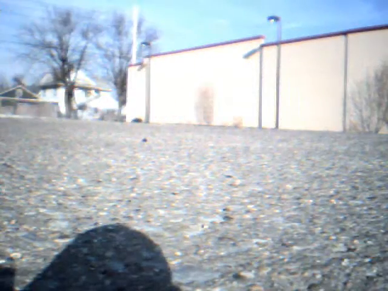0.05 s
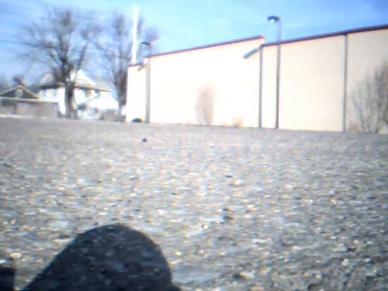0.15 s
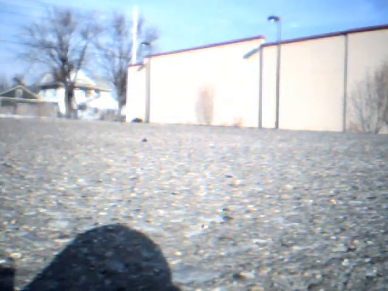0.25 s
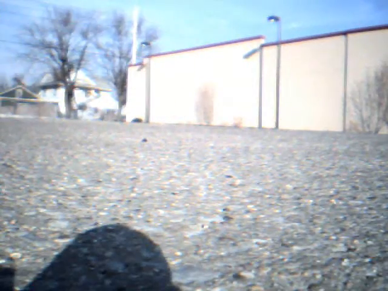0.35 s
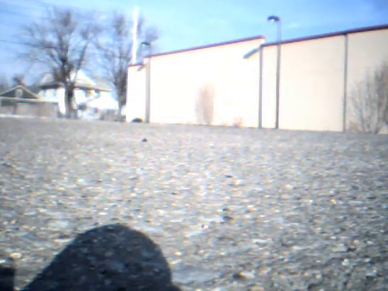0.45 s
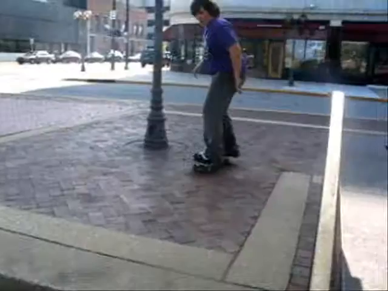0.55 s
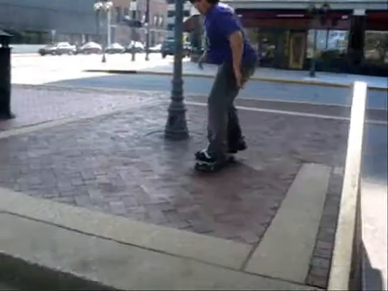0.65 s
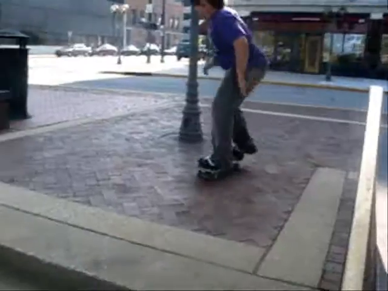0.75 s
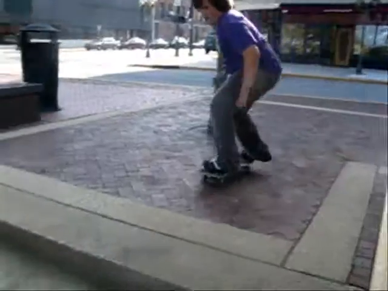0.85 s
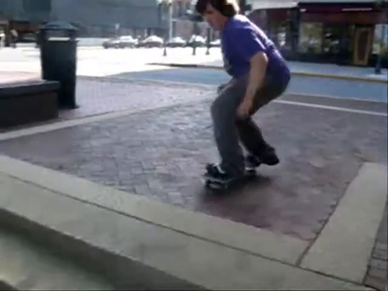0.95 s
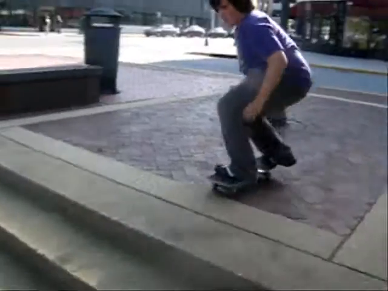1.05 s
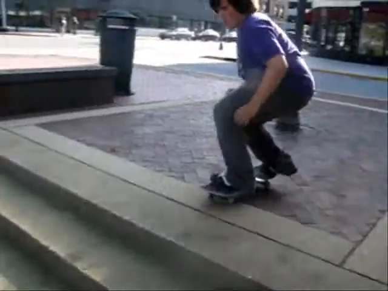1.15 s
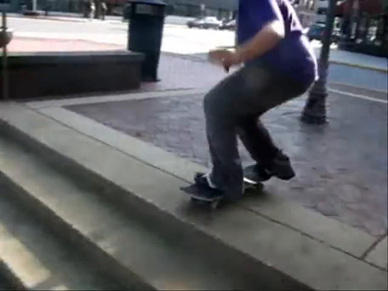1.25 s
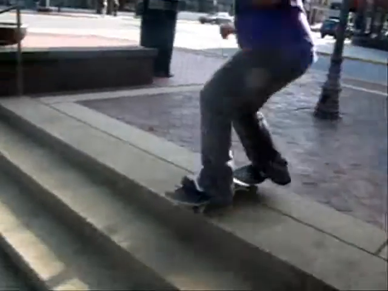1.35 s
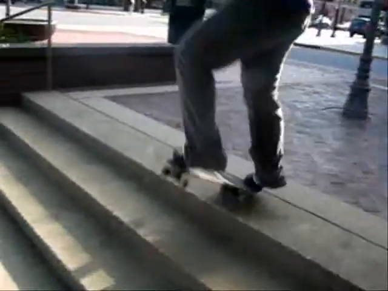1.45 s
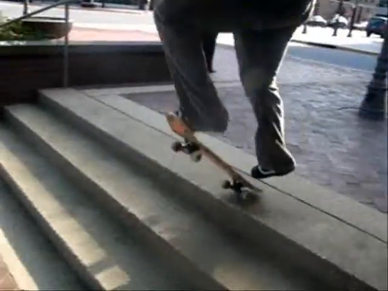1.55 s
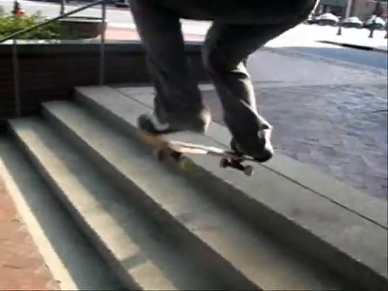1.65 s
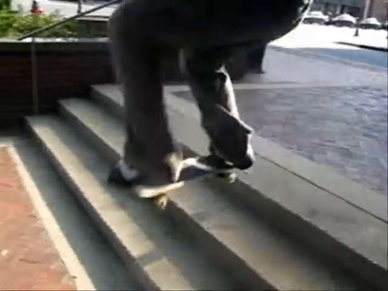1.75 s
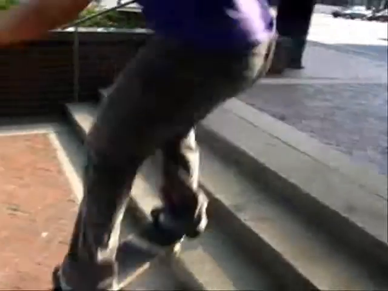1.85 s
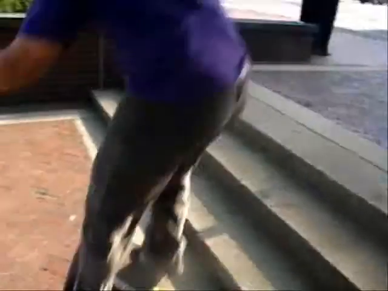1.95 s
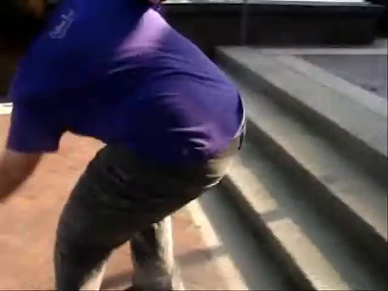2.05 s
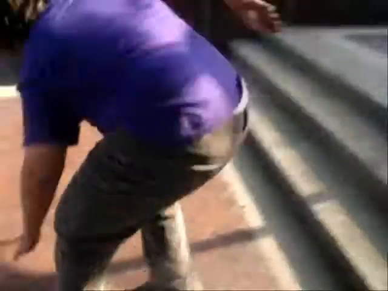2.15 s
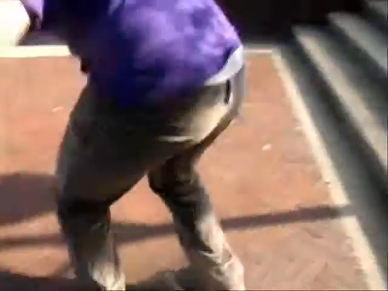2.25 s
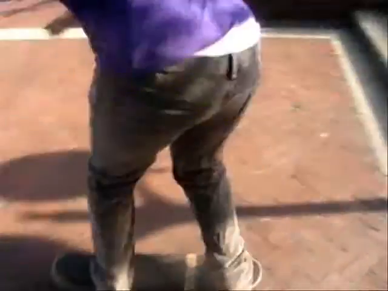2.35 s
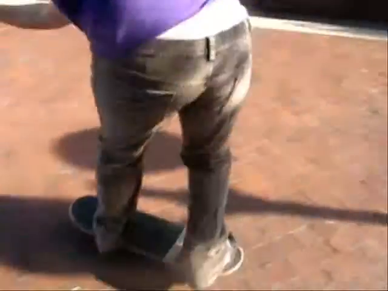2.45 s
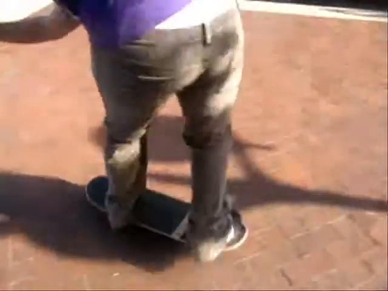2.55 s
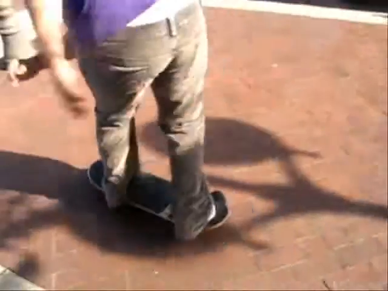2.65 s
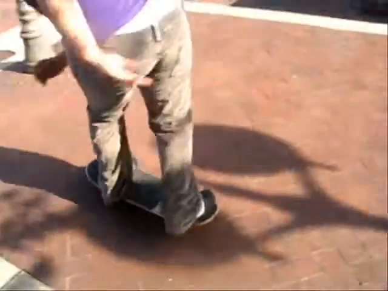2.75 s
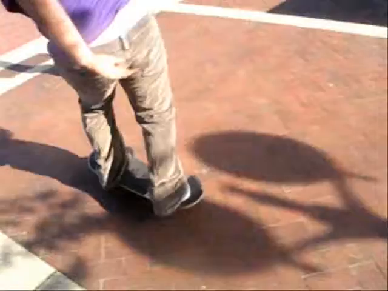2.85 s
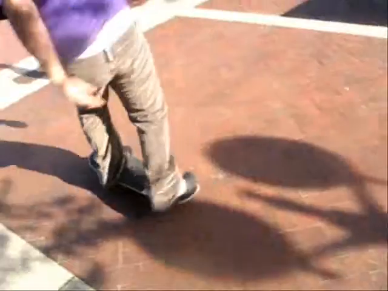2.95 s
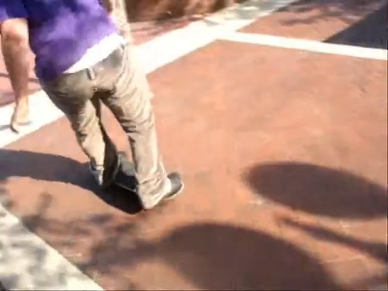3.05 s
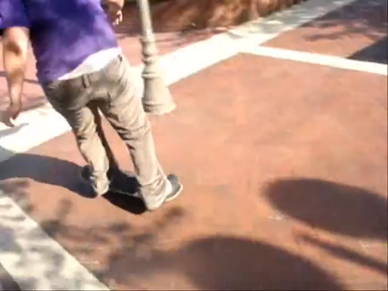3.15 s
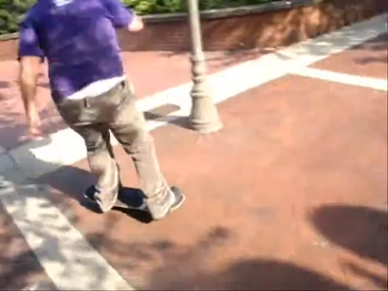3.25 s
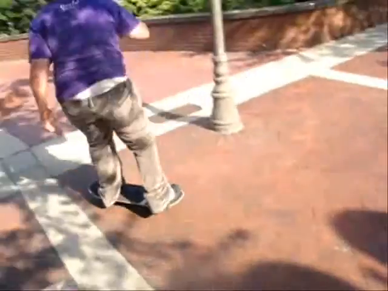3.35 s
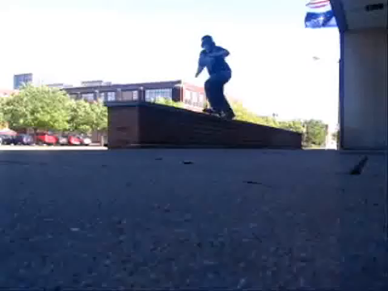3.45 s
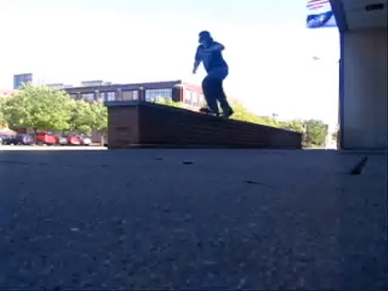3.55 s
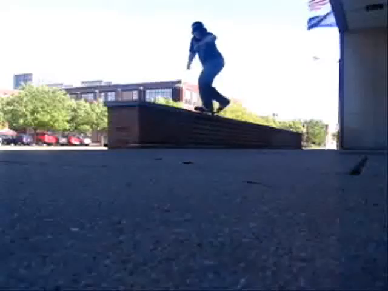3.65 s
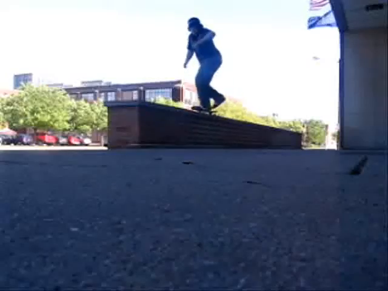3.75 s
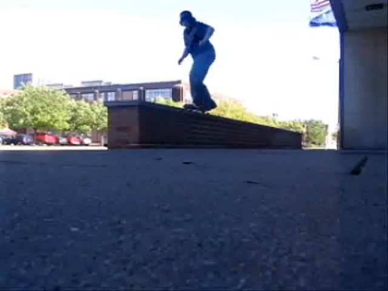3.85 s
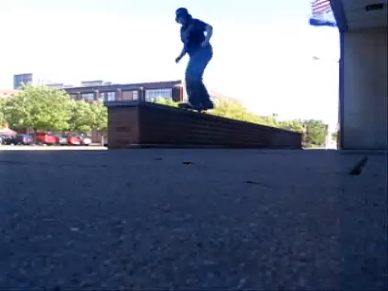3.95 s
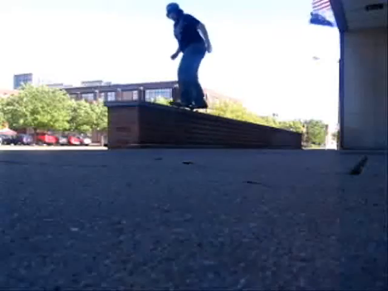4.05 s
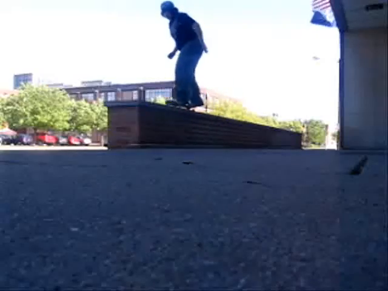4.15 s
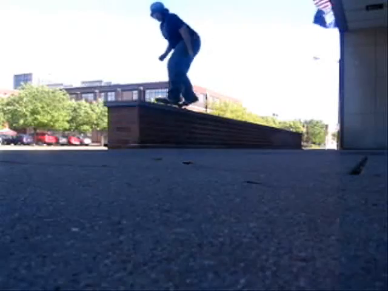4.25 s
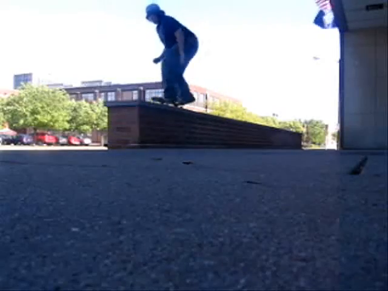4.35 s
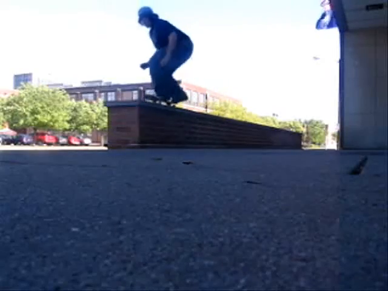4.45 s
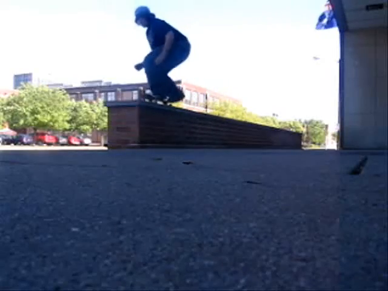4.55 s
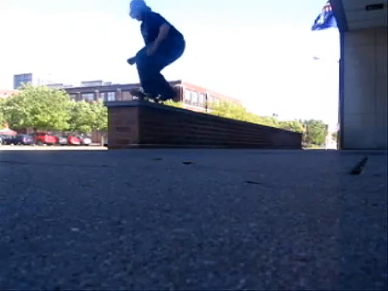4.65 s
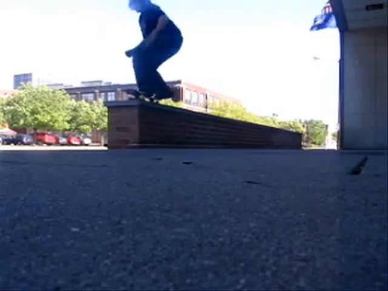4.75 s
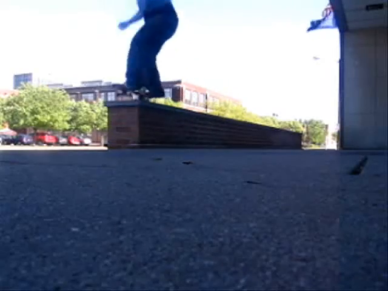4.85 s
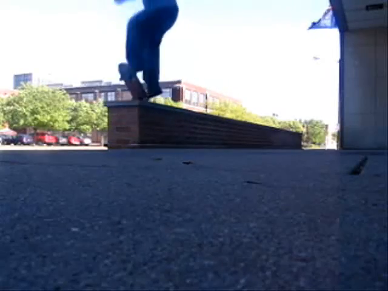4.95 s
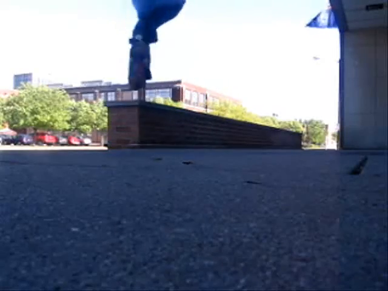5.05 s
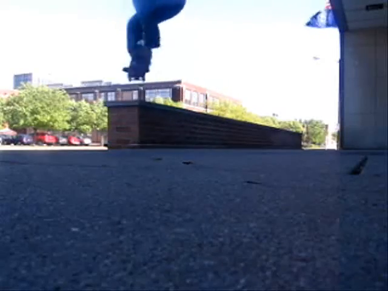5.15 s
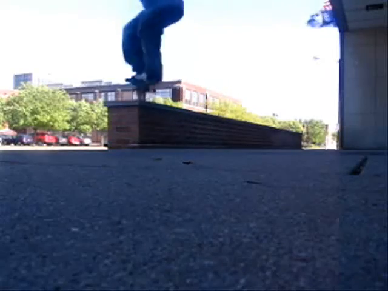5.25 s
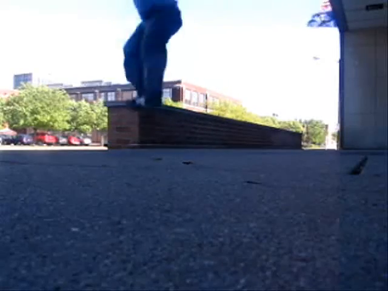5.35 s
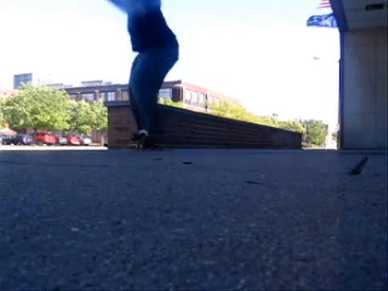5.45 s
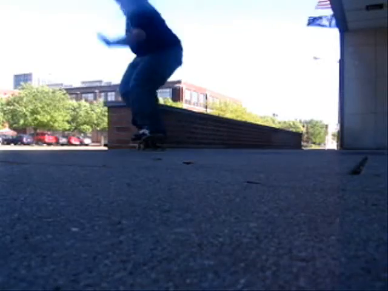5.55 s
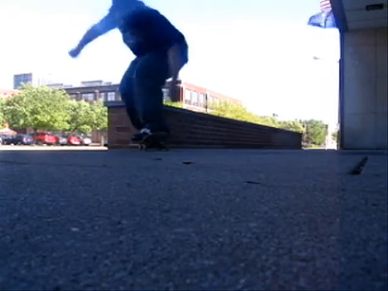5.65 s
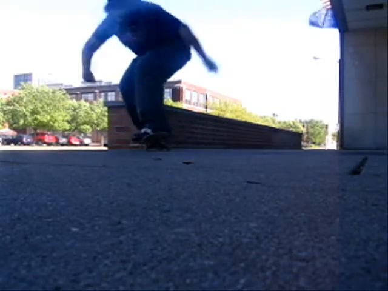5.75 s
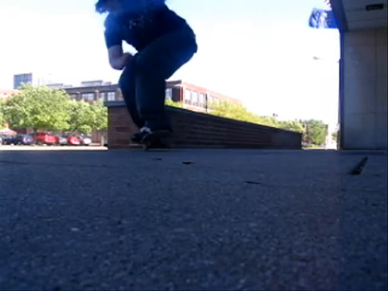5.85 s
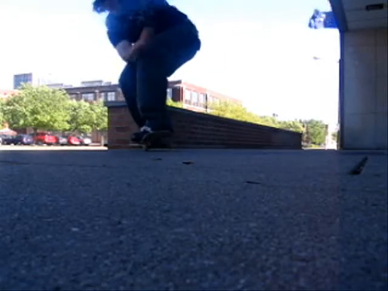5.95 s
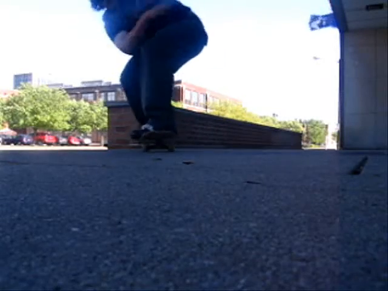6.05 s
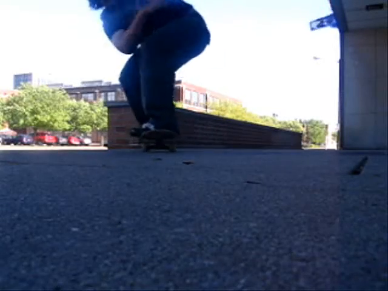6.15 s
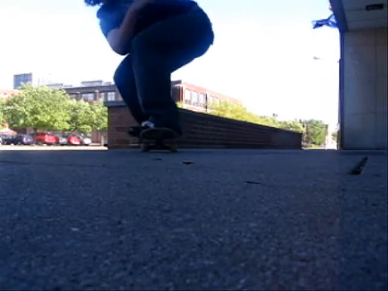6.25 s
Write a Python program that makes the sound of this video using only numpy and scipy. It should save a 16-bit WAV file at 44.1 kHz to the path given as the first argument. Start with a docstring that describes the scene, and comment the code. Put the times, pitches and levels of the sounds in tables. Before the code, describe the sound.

A skateboard rumbles and clicks over brick pavers, pops off some steps with its wheels whirring, slams down and rolls on. A second board follows at once, rolling along a brick ledge, snapping off the end and landing on concrete close by. Metal trucks clink, and faint traffic and moving air lie underneath. The outdoor sound comes through a small microphone with gritty treble that overloads on hard impacts.

```python
"""A skateboard rumbles over brick pavers, pops over steps with its wheels spinning, slams down, rolls on. Then
the scene changes: a second board rides a brick ledge, pops off the end and lands on concrete close by. Grit
under the wheels and every blow excite the resonant modes of the board; the metal trucks clink. Nearby walls add
a short tail to the impacts, and distant traffic and moving air lie underneath. All is heard through a small
camera that overloads easily and aliases the treble."""
import sys
import numpy as np
from scipy import signal
from scipy.fft import rfft, irfft
from scipy.io import wavfile
from scipy.ndimage import uniform_filter1d

SR = 44100
rng = np.random.default_rng(int(sys.argv[2]) if len(sys.argv) > 2 else 0)


def output_pcm(signal):
    """Save a mono or channel-first signal as 16-bit PCM at the path in sys.argv[1].

    Samples are clipped to [-1, 1] before scaling.
    """
    pcm = np.clip(np.atleast_2d(signal).T, -1, 1) * 32767
    wavfile.write(sys.argv[1], SR, np.round(pcm).astype(np.int16))


N = 277908
TIME = np.arange(N) / SR
FIRST_RUN_S, SECOND_RUN_S = 0.647, 3.51
RUMBLE_HZ, GRIT_HZ = 260, 1400  # crossovers: rumble below, deck tone between, grit above

# How hard the wheels drive the board, and the grit relative to that: time_s, drive_db, grit_db
PAVERS_DRIVE = [(0.646, -17, -9.5), (0.8, -17, -8), (0.95, -21.5, -6.5), (1.02, -18, -8), (1.1, -21.5, -7),
                (1.23, -18, -7.5), (1.37, -24.5, -2.5), (1.39, -29, -6.5), (1.51, -23, -6)]
STAIRS_DRIVE = [(1.53, -29, 0), (1.59, -35.5, 2), (1.68, -26.5, -2.5), (1.77, -42.5, 3), (1.81, -30, -1),
                (2.06, -24, -4.5), (2.13, -28, -10), (2.27, -23.5, -10.5), (2.31, -31.5, -3)]
PLAZA_DRIVE = [(2.31, -34.5, -3.5), (2.505, -20.5, -6), (2.56, -30.5, -13), (2.7, -24.5, -11.5),
               (3.02, -21, -7.5), (3.15, -15.5, -7.5), (3.33, -24, -2.5), (3.355, -32.5, -11),
               (3.51, -28.5, -7.5)]
LEDGE_DRIVE = [(3.51, -22.5, -5), (3.58, -22.5, -9), (3.72, -16.5, -13.5), (3.84, -21.5, -11.5),
               (3.97, -16, -12.5), (4.07, -22, -10.5), (4.67, -21.5, -11.5), (4.92, -16, -7.5),
               (5.09, -25, -3), (5.15, -37, 1)]
DROP_DRIVE = [(5.15, -33, -16), (5.21, -39, -6), (5.28, -32.5, -2), (5.33, -28, -8), (5.39, -35, -2.5),
              (5.51, -30, -6.5), (5.56, -23, -12)]
PAVEMENT_DRIVE = [(5.56, -25, 6), (5.62, -21, -7.5), (5.69, -20.5, -8.5), (5.92, -22.5, -7.5),
                  (6.1, -20, -1.5), (6.22, -14.5, -8.5), (6.3, -20, -4.5)]
# Spectral envelope of the wheel noise on each stretch: frequency_hz, relative_db
PAVERS_COLOUR = [(18, -47), (30, -8), (97, 2.5), (203, -2), (349, -15), (474, -11), (564, -9), (671, -12),
                 (816, -11), (992, 3), (1400, -20.5), (2080, -6.5), (5400, -22.5), (7020, -42),
                 (11900, -120)]
STAIRS_COLOUR = [(18, -48), (30, -15), (143, 6), (182, -3), (434, -7.5), (671, -3.5), (890, -15),
                 (1180, -9), (1600, -22), (1940, -14), (5400, -13), (7020, -60), (11900, -120)]
PLAZA_COLOUR = [(18, -41), (30, -24), (54, 4), (97, -10), (129, 8.5), (182, -7.5), (231, -2.5), (314, -6.5),
                (416, -9), (671, -2), (1370, -23), (2750, -22), (5400, -30), (7020, -62), (11900, -120)]
LEDGE_COLOUR = [(20, 1), (45, -6.5), (90, -5.5), (150, -3), (200, -4), (434, -4.5), (642, -2),
                (1040, -13.5), (1350, -24), (1780, -35), (2470, -38), (5400, -32.5), (7000, -46)]
DROP_COLOUR = [(18, -34), (30, 1.5), (167, -17), (281, -14.5), (320, -14), (781, -19), (1040, -16),
               (5400, -44), (7020, -70), (11900, -120)]
PAVEMENT_COLOUR = [(20, 2), (45, -14.5), (140, -21.5), (180, -12), (240, -11.5), (330, -8), (552, 1.5),
                   (700, -1.5), (1010, -13.5), (1400, -33.5), (1740, -32), (5400, -53.5), (7000, -52)]
# Resonances standing out of those envelopes: pitch_hz, width_hz, relative_db
PAVERS_MODES = [(195, 78, -1.5), (490, 103, 1.5), (700, 67, 2.5), (2070, 180, -32)]
STAIRS_MODES = [(670, 105, 3.5), (1027, 47, -0.5), (1175, 140, -1), (1940, 280, -4.5), (2300, 74, -4.5),
                (2760, 55, -2), (3060, 180, -5)]
PLAZA_MODES = [(136, 24, 0), (692, 75, 7.5), (2080, 390, -10), (2730, 63, -8), (3060, 39, -12)]
LEDGE_MODES = [(149, 18, 1), (369, 29, -3.5), (440, 20, 1), (697, 69, -2.5), (1040, 42, -13),
               (1810, 390, -21)]
DROP_MODES = [(540, 90, 0), (720, 57, 2.5), (1040, 62, 5), (1700, 130, -7), (2000, 130, -4.5),
              (2370, 120, -7.5)]
PAVEMENT_MODES = [(563, 79, 7), (1740, 170, -24)]
# Spectrum of distant traffic and moving air: frequency_hz, relative_db
TOWN_COLOUR = [(20, 7), (50, -20), (130, -30), (500, -9), (1000, -21), (2000, -24), (3500, -26),
               (5400, -25.5)]
# Wheels dropping into the wider joints: start_s, knock_db, crack_db
WIDE_JOINTS = [(0.648, -23, -22), (0.79, -10, -21), (0.829, -7, -22.5), (0.914, -9.5, -25),
               (1.068, -11, -35), (1.255, -6.5, -24), (2.331, -21, -25.5), (2.421, -10.5, -28),
               (2.465, -8, -21), (2.647, -12.5, -39), (2.866, -9, -32), (2.877, -9.5, -26.5),
               (2.995, -5.5, -16), (3.038, -6.5, -25), (3.059, -10.5, -20.5), (3.213, -6, -18),
               (3.758, -14, -30), (4.002, -4, -42), (4.357, -6, -18.5), (4.376, -5.5, -22),
               (4.589, -5.5, -27.5), (4.922, -6, -28), (4.956, -5, -30), (6.095, -14, -13.5)]
# Tail pops, feet catching the deck, landings and rebounds: start_s, knock_db, crack_db, chatter_s
BLOWS = [(1.364, -4.5, -14.5, 0.0065), (1.498, -24, -18, 0.0086), (1.511, -12.5, -12, 0.005),
         (1.651, -9, -11, 0.0051), (1.803, -22, -27, 0.0042), (2.074, 5.5, -9, 0.011),
         (2.085, -2.5, -12.5, 0.0084), (2.098, -12, -28, 0.0037), (2.193, -15, -30, 0.015),
         (2.237, -10, -31, 0.0045), (2.283, -26, -29, 0.0065), (2.379, -14.5, -23.5, 0.0097),
         (2.494, -5, -17.5, 0.0055), (2.512, -15, -32, 0.0065), (3.328, -6.5, -10, 0.003),
         (3.476, -5, -9, 0.0013), (5.089, -18.5, -18, 0.015), (5.304, -28, -38, 0.016),
         (5.524, -19, -33, 0.012), (5.531, -9, -13, 0.011), (5.544, -4, -10, 0.0082),
         (5.553, -1.5, -25.5, 0.015), (5.578, -5.5, -29, 0.013)]
# Spectral envelope of each board when struck: frequency_hz, relative_db
FIRST_BOARD_COLOUR = [(60, -36), (200, 1), (400, 0), (600, 10.5), (850, 5.5), (1100, -7.5), (1700, -12.5),
                      (2900, -10), (4200, -18.5), (5400, -15)]
SECOND_BOARD_COLOUR = [(60, -50), (200, -3), (400, 7.5), (850, 3), (1300, -18), (1800, -14), (3000, -25),
                       (4200, -26.5), (5400, -23.5)]
# Modes of each board when struck: pitch_hz, width_hz, relative_db
FIRST_BOARD_MODES = [(344, 120, 6), (630, 200, -24), (858, 84, 5.5), (1070, 56, 0.5), (1260, 36, -3),
                     (1890, 97, -19), (2270, 78, -10), (2720, 100, -12.5), (3090, 110, -8),
                     (3600, 110, -30), (4010, 180, -10.5)]
SECOND_BOARD_MODES = [(390, 130, -14), (540, 49, 7), (914, 57, 8.5), (1044, 29, 7), (1390, 43, -25),
                      (1565, 31, -29), (1690, 13, -6), (2700, 100, -10.5), (3000, 100, -14)]
# Bright rings of the metal trucks: start_s, pitch_hz, level_db, t60_s
TRUCK_CLINKS = [(1.514, 1270, -7, 0.02), (1.803, 1830, -10.5, 0.014), (2.239, 3940, -18.5, 0.013),
                (2.283, 2760, -24, 0.027), (2.38, 2966, -14.5, 0.052), (2.388, 3010, -14, 0.022),
                (3.294, 1950, -6, 0.024), (3.315, 1930, -15, 0.067), (3.329, 3280, -9, 0.017),
                (3.476, 3510, -9, 0.0074), (5.1036, 3000, 11.5, 0.0025), (5.249, 1900, -23.5, 0.043),
                (5.53, 4950, -0.5, 0.0045)]
# Brief swells of the wheel noise: middle_s, length_s, deck_gain_db, boom_gain_db
WHEEL_SWELLS = [(2.017, 0.098, 0, 11.5), (3.31, 0.043, 1, 12.5), (3.66, 0.06, 0, 10.5),
                (3.77, 0.052, 6.5, 13.5), (3.966, 0.13, 5.5, 13), (4.35, 0.085, 7, 0)]
# Band that booms during those swells: low_hz, high_hz
BOOM_BAND = [115, 300]


def undb(db):
    """Amplitude ratio: tenfold for every 20 dB."""
    return 10 ** (np.asarray(db) / 20)


def unit(x):
    """Normalisation to an rms of 1."""
    return x / np.sqrt(np.mean(x ** 2))


def cut(x, hz, kind, order=4):
    """Butterworth filtering, maximally flat in the passband."""
    return signal.sosfilt(signal.butter(order, hz, kind, fs=SR, output="sos"), x)


def wander(per_s, size):
    """Slow random modulation: interpolated noise with a spread near 1."""
    steps = np.arange(size) / SR * per_s
    return 1.2 * np.interp(steps, np.arange(4096), rng.standard_normal(4096))


def steady(x, size=2205):
    """Division by the running rms evens out the level and keeps the grain."""
    power = uniform_filter1d(uniform_filter1d(x ** 2, size), size)
    return x / np.sqrt(power + 1e-12)


def during(start_s, end_s):
    """A time gate with very short ramps."""
    return uniform_filter1d(1. * ((TIME >= start_s) & (TIME < end_s)), size=64)


def contacts(per_s, spread_db, size):
    """Shot noise: tiny independent impacts, a few much harder than the rest."""
    happens = rng.random(size) < per_s / SR
    force = undb(spread_db * np.minimum(rng.exponential(size=size), 4))
    return happens * force * rng.choice([-1, 1], size)


def board_response(colour, modes, modes_db, size=8192):
    """Minimum-phase impulse response: damped resonances add in power to a broad spectrum."""
    hz = np.arange(1, size // 2 + 2) * SR / size
    colour_hz, colour_db = np.transpose(colour)
    broad = undb(np.interp(np.log(hz), np.log(colour_hz), colour_db)) ** 2
    rings = sum(undb(db) ** 2 / (1 + ((hz ** 2 - pitch ** 2) / (hz * width)) ** 2)
                for pitch, width, db in modes)
    power = broad / broad.sum() + undb(modes_db) ** 2 * rings / rings.sum()
    # folding the cepstrum onto positive time makes the response causal
    cepstrum = irfft(np.log(power) / 2)
    cepstrum[1:size // 2] *= 2
    cepstrum[size // 2 + 1:] = 0
    return irfft(np.exp(rfft(cepstrum)))[:size // 2]


def roll(stretch, colour, modes, modes_db, turn_hz, throb_db, grains_per_s, spread_db, trim_db,
         bass_db, bass_follow, bass_rise_db_per_s=0):
    """Forced vibration: countless small contacts, modulated once a wheel turn, ring the board."""
    times, drive_db, grit_db = np.transpose(stretch)
    inside = (TIME > times[0] - .1) & (TIME < times[-1] + .1)
    t = TIME[inside]
    turns = np.cumsum(turn_hz * (1 + 0.057 * wander(4.94, len(t)))) / SR
    load = undb(throb_db * (np.cos(2 * np.pi * turns) + 0.65 * wander(110, len(t))))
    force = contacts(grains_per_s, spread_db, len(t)) * load
    board = signal.fftconvolve(force, board_response(colour, modes, modes_db))[:len(t)]
    drive = np.interp(t, times, drive_db) + 1.47 * wander(21.8, len(t))
    mean_db = drive.mean()
    # the rumble follows the drive in proportion; a rise brings the board nearer
    rumble_db = mean_db + bass_db + bass_follow * (drive - mean_db) + bass_rise_db_per_s * (t - t.mean())
    swell_db, boom_db = wheel_swells(t)
    bands = [(cut(board, RUMBLE_HZ, "low"), rumble_db),
             (cut(board, [RUMBLE_HZ, GRIT_HZ], "band"), drive + swell_db),
             (cut(board, GRIT_HZ, "high"), drive + np.interp(t, times, grit_db) + 0.92 * swell_db)]
    boom = steady(cut(board, BOOM_BAND, "band", order=2))
    boom *= undb(rumble_db + trim_db) * (undb(boom_db) - 1)
    out = np.zeros(N)
    out[inside] = boom + sum(steady(band) * undb(db + trim_db) for band, db in bands)
    return out


def wheels():
    """Excitation and filter change over six stretches; off the ground the spinning bearings whirr."""
    edges_s = [FIRST_RUN_S, 1.53, 2.31, SECOND_RUN_S, 5.15, 5.56, np.inf]
    stretches = [
        roll(PAVERS_DRIVE, PAVERS_COLOUR, PAVERS_MODES, modes_db=3.5, turn_hz=27.26, throb_db=1,
             grains_per_s=3000, spread_db=-0.4, trim_db=0.5, bass_db=-3, bass_follow=0.76),
        roll(STAIRS_DRIVE, STAIRS_COLOUR, STAIRS_MODES, modes_db=3, turn_hz=27.16, throb_db=-1.5,
             grains_per_s=6000, spread_db=2.5, trim_db=-1, bass_db=-1.5, bass_follow=0.11),
        roll(PLAZA_DRIVE, PLAZA_COLOUR, PLAZA_MODES, modes_db=-5.5, turn_hz=26.46, throb_db=1,
             grains_per_s=3700, spread_db=2, trim_db=0, bass_db=-4, bass_follow=0.81),
        roll(LEDGE_DRIVE, LEDGE_COLOUR, LEDGE_MODES, modes_db=-2.5, turn_hz=24.5, throb_db=0.5,
             grains_per_s=4000, spread_db=1.5, trim_db=-1, bass_db=-4, bass_follow=1.18),
        roll(DROP_DRIVE, DROP_COLOUR, DROP_MODES, modes_db=2.5, turn_hz=25.9, throb_db=-1,
             grains_per_s=9000, spread_db=3, trim_db=-1.5, bass_db=-3.5, bass_follow=0.3,
             bass_rise_db_per_s=48),
        roll(PAVEMENT_DRIVE, PAVEMENT_COLOUR, PAVEMENT_MODES, modes_db=-14, turn_hz=23.75, throb_db=-0.4,
             grains_per_s=5500, spread_db=2, trim_db=-1, bass_db=-5.5, bass_follow=1)]
    return sum(x * during(start, end) for x, start, end in zip(stretches, edges_s, edges_s[1:]))


def town(level_db=-38, swell_db=1):
    """Incoherent sources, traffic and air, sum to a low, slowly swelling noise."""
    colour_hz, colour_db = np.transpose(TOWN_COLOUR)
    hz = np.arange(1, N // 2 + 2) * SR / N
    spectrum = undb(np.interp(np.log(hz), np.log(colour_hz), colour_db))
    bed = irfft(rfft(rng.standard_normal(N)) * spectrum, N)
    return unit(bed) * undb(level_db + swell_db * wander(2.54, N)) * during(FIRST_RUN_S, np.inf)


def narrow_joints(stretch, per_s, knock_db, crack_db, scatter_db=3):
    """Random impacts at gaps between bricks scale with the drive; rows as in WIDE_JOINTS."""
    times, drive_db, _ = np.transpose(stretch)
    span_s = times[-1] - times[0]
    when, strength = rng.random((64, 2))[:int(per_s * span_s)].T
    starts = times[0] + when * span_s
    force_db = np.interp(starts, times, drive_db) + scatter_db * (2 * strength - 1)
    return list(zip(starts, force_db + knock_db, force_db + crack_db))


def blows(rows, colour, modes, modes_db, ring_growth, strike, vary_db, knock_trim_db, crack_trim_db):
    """Impulse excitation: one hard contact and a dying chatter of wheels and trucks ring the board."""
    size = 6000
    out, t = np.zeros(N + size), np.arange(size) / SR
    for start_s, knock_db, crack_db, chatter_s in rows:
        # the striking point and the load of the feet change the mix of modes
        struck = [(hz * (1 + 0.0098 * rng.normal()), width, db + vary_db * rng.normal())
                  for hz, width, db in modes]
        # light taps only clack; heavy blows flex the whole deck and bring its modes out
        response = board_response(colour, struck, modes_db + ring_growth * knock_db)
        force = contacts(per_s=6000, spread_db=1.43, size=size) * np.exp(-t / chatter_s)
        force /= np.sqrt(np.sum(force ** 2) + 1e-12)
        force[0] += strike
        ring = signal.fftconvolve(force, response)[:size]
        knock = unit(cut(ring, GRIT_HZ, "low")) * undb(knock_db + knock_trim_db)
        crack = unit(cut(ring, GRIT_HZ, "high")) * undb(crack_db + crack_trim_db)
        start = int(start_s * SR)
        # energy grows in proportion to the chatter time
        out[start:start + size] += (knock + crack) * np.sqrt(chatter_s * SR / size)
    return out[:N]


def walls(x, t60_s, wet_db, dull_hz, size=26000):
    """Reverberation: scattering from ground and house fronts adds a duller, decaying tail."""
    t = np.arange(size) / SR
    tail = cut(rng.standard_normal(size), dull_hz, "low", order=1)
    tail *= undb(-60 * t / t60_s) * (1 - np.exp(-t / 0.0014))
    tail /= np.sqrt(np.sum(tail ** 2))
    return x + undb(wet_db) * signal.fftconvolve(x, tail)[:N]


def truck_clinks(size=4000):
    """Free vibration of metal: each clink is one quickly damped sinusoid."""
    out, t = np.zeros(N + size), np.arange(size) / SR
    for start_s, pitch_hz, level_db, t60_s in TRUCK_CLINKS:
        start = int(start_s * SR)
        out[start:start + size] += np.sin(2 * np.pi * pitch_hz * t) * undb(level_db - 60 * t / t60_s)
    return out[:N]


def wheel_swells(t):
    """Amplitude modulation: brief swells of deck tone and boom, on rough ground or just before landing."""
    middle_s, length_s, deck_gain_db, boom_gain_db = np.transpose(WHEEL_SWELLS)
    bells = np.exp(-(2 * (t[:, None] - middle_s) / length_s) ** 2)
    return bells @ deck_gain_db, bells @ boom_gain_db


def scene(joint_chatter_s=0.005):
    """Superposition of the wheel noise, the town and the reverberant impacts of both boards."""
    rolling, bed = wheels(), town()
    joints = WIDE_JOINTS + narrow_joints(PAVERS_DRIVE, per_s=9, knock_db=1, crack_db=-9)
    joints += narrow_joints(PLAZA_DRIVE, per_s=6, knock_db=-7, crack_db=-10)
    hits = BLOWS + [(*joint, joint_chatter_s) for joint in joints]
    first = blows([hit for hit in hits if hit[0] < SECOND_RUN_S], FIRST_BOARD_COLOUR, FIRST_BOARD_MODES,
                  modes_db=-2, ring_growth=0.8, strike=0.4, vary_db=5.5,
                  knock_trim_db=-6, crack_trim_db=5)
    second = blows([hit for hit in hits if hit[0] >= SECOND_RUN_S],
                   SECOND_BOARD_COLOUR, SECOND_BOARD_MODES,
                   modes_db=1, ring_growth=1, strike=0.46, vary_db=2, knock_trim_db=-5, crack_trim_db=4)
    impacts = walls(first + truck_clinks(), t60_s=0.46, wet_db=-24.5, dull_hz=2030)
    impacts += walls(second, t60_s=0.52, wet_db=-13.5, dull_hz=2500)
    return (rolling + impacts + bed)[None]


def record(dry, ceiling=0.56, soft_hz=4800, hold_samples=4, top_hz=15600):
    """Saturation flattens peaks in the camera; sample-and-hold mirrors the sound into a gritty treble."""
    saturated = dry / (1 + (np.abs(dry) / ceiling) ** 8) ** (1 / 8)
    smooth = cut(saturated, soft_hz, "low", order=2)
    held = np.repeat(smooth[:, ::hold_samples], hold_samples, axis=1)[:, :N]
    return signal.sosfilt(signal.ellip(8, .2, 70, top_hz, fs=SR, output="sos"), held)


dry = scene()
out = record(dry)
output_pcm(out)
```